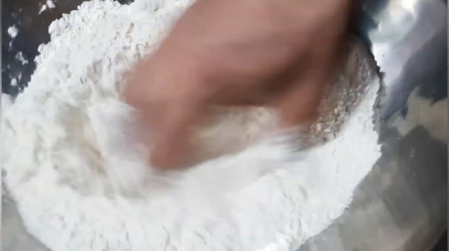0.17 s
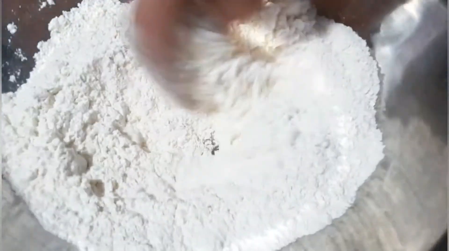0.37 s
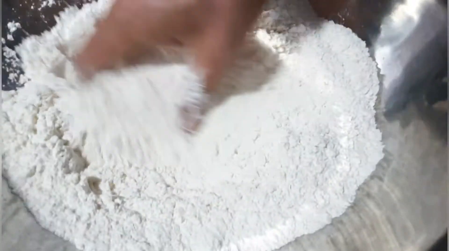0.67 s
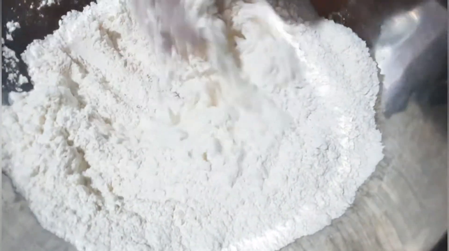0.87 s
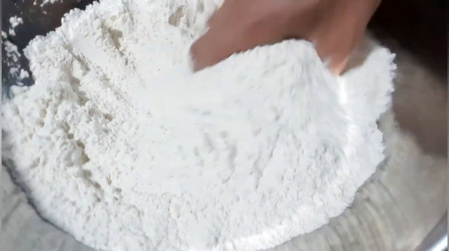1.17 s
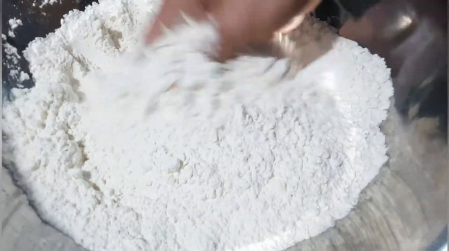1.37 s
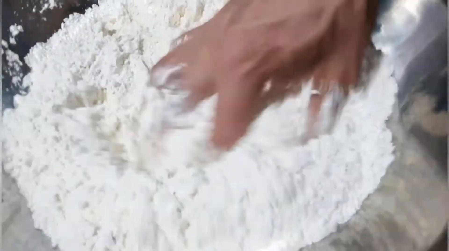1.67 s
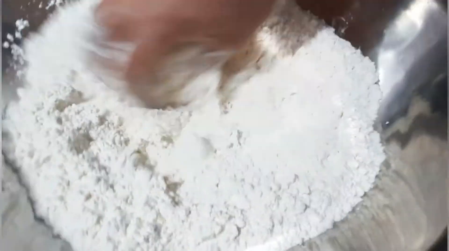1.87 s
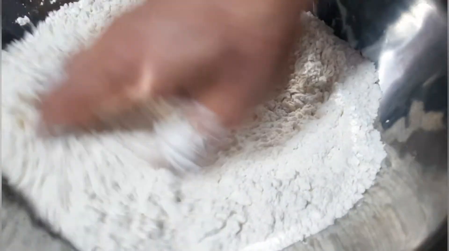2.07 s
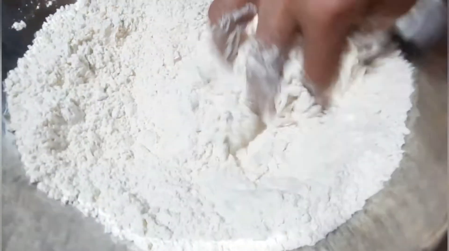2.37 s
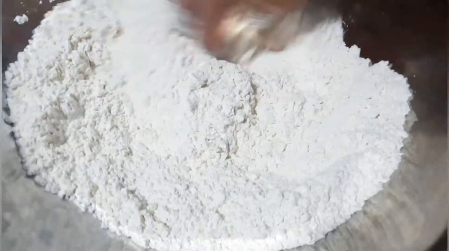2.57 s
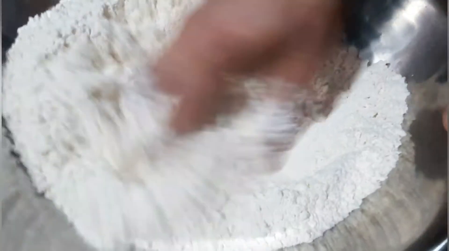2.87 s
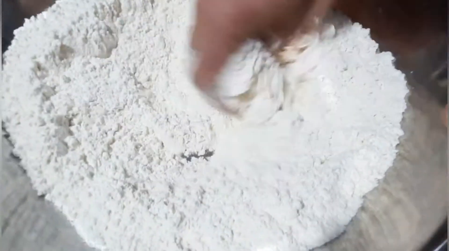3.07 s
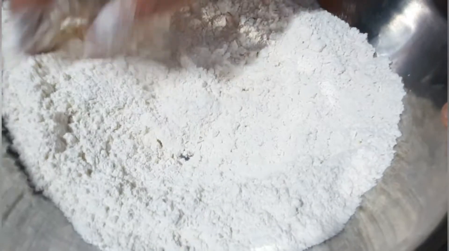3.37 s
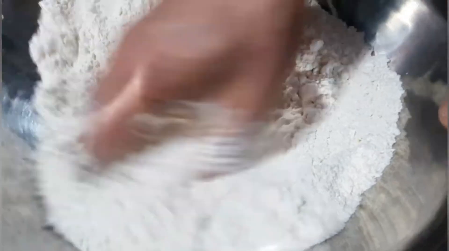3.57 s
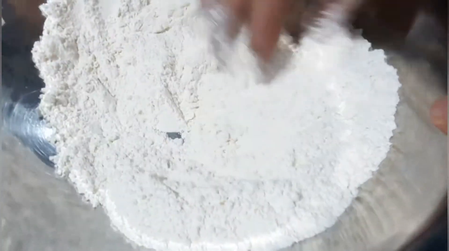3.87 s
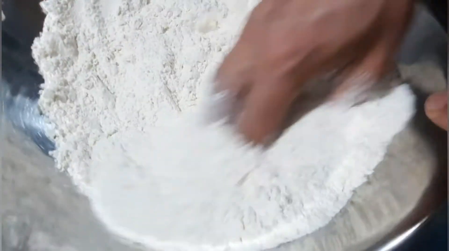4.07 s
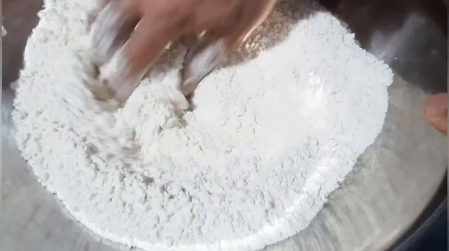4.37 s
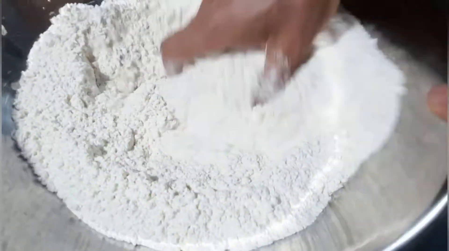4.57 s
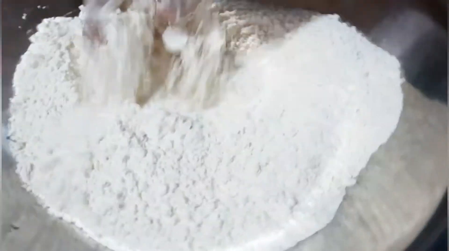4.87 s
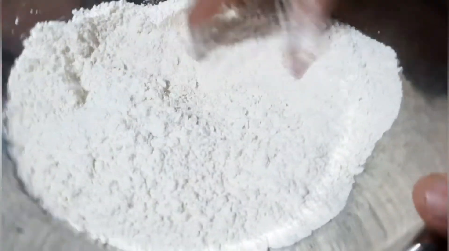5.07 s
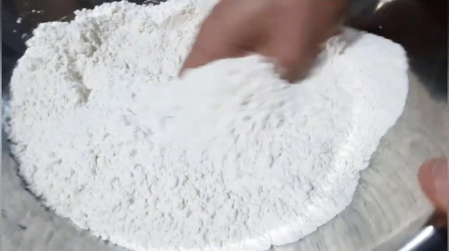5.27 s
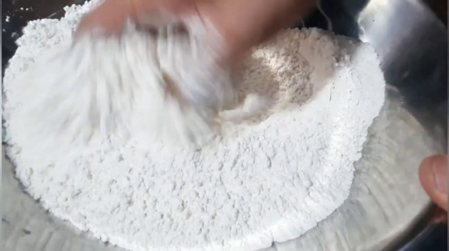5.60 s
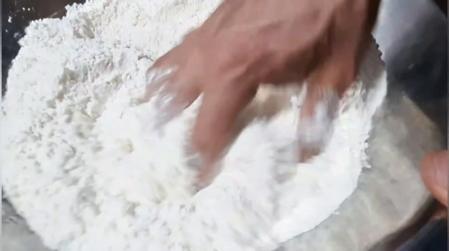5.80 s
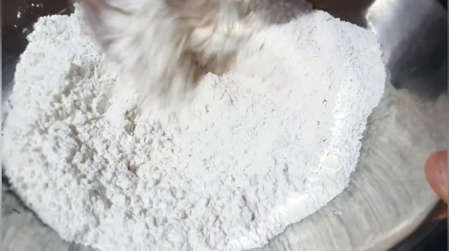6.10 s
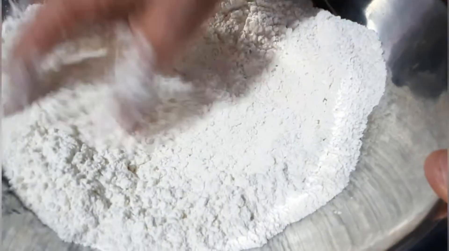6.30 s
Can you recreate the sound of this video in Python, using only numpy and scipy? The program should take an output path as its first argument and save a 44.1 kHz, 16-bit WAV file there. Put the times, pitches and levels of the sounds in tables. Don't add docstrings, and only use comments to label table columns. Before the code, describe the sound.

Irregular sandy strokes of flour come and go, some with a brief squeaky rub of fingertip on steel. Light clicks and muffled low knocks of the bowl against the table start sparse, then cluster near one, three, four and five seconds before easing. The sound is close, dry and quiet, over steady low fan hum, high shimmering insects and faint hiss.

```python
import sys
import numpy as np
from scipy import signal
from scipy.fft import rfft, irfft, next_fast_len
from scipy.io import wavfile
from scipy.ndimage import uniform_filter1d

SR = 44100
rng = np.random.default_rng(int(sys.argv[2]) if len(sys.argv) > 2 else 0)


def unload_audio(sound):
    columns = np.transpose(np.atleast_2d(sound))
    steps = np.round(np.clip(columns, -1, 1) * 32767)
    wavfile.write(sys.argv[1], SR, steps.astype(np.int16))


def nominal_scale(level):
    x = np.asarray(level, float) / 20
    return 10 ** x


N = 283959

# f/Hz, width/Hz, level/dB
HOLLOW = [(255, 30, 4), (296, 13, 12), (332, 11, 13), (353, 14, 7), (425, 25, -12), (195, 25, 3)]
CONTROL_STEP = 64
PORT_LAG, RIM_LAG = 10, 4


def evened(x):
    return x / np.sqrt(np.mean(x ** 2) + 1e-20)


def read(points, hz):
    f, value = np.transpose(points)
    return np.interp(np.log(hz + 1), np.log(f + 1), value)


def add(mix, s, sound):
    part = mix[..., round(s * SR):][..., :sound.shape[-1]]
    part += sound[..., :part.shape[-1]]


def resonate(x, hz, width):
    r = np.exp(-np.pi * width / SR)
    pole = r * np.exp(2j * np.pi * hz / SR)
    return 2 * signal.lfilter([1 - r], [1, -pole], x).real


def coloured(x, points):
    size = next_fast_len(N)
    gain = nominal_scale(read(points, np.fft.rfftfreq(size, 1 / SR)))
    return evened(irfft(rfft(x, size) * gain, size)[:N])


def drift(rate_hz):
    noise = uniform_filter1d(rng.standard_normal(N), size=200)
    return evened(signal.lfilter([1], [1, -np.exp(-2 * np.pi * rate_hz / SR)], noise))


def grit(per_s, spread_db):
    size = nominal_scale(spread_db * np.minimum(rng.exponential(1, N), 5)) * rng.choice([-1, 1], N)
    return evened(size * (rng.random(N) < per_s / SR))


def ports(x, same, pan_db, other, lag=PORT_LAG):
    same = np.clip(same, 0, 1)
    right = same * np.roll(x, lag, -1) + np.sqrt(1 - same ** 2) * other
    return np.array([x * nominal_scale(pan_db / 2), right * nominal_scale(-pan_db / 2)])


def patchy(x, depth_db, centre_hz=None, fall_db=0):
    hz, t, z = signal.stft(x, SR, nperseg=512, noverlap=384)
    patches = rng.standard_normal((len(t), len(hz))).T
    patches = uniform_filter1d(uniform_filter1d(patches, size=6, axis=0), size=9, axis=1)
    shape_db = depth_db * evened(patches)
    if fall_db:
        centre = np.interp(t, np.arange(N) / SR, centre_hz)
        away = abs(np.log2((hz[:, None] + 50) / centre))
        focus_db, focus_oct, focus_top_hz = 9, .12, 1100
        low = np.minimum(focus_top_hz / centre, 1) ** 4
        shape_db += focus_db * low * np.exp(-(away / focus_oct) ** 2) - fall_db * away
    out = signal.istft(z * nominal_scale(shape_db), SR, nperseg=512, noverlap=384)[1][..., :N]
    return out / np.sqrt(uniform_filter1d((out ** 2).mean(0), size=5000))


def strokes(rows, rise, fall):
    start, length, db, sag_db = np.array(rows).T[:4, :, None]
    since = np.arange(0, N + CONTROL_STEP, CONTROL_STEP) / SR - start
    db = db - sag_db * np.clip(since / length, 0, 1)
    db = db - rise * np.maximum(-since, 0) - fall * np.maximum(since - length, 0)
    return nominal_scale(np.maximum(db, -140)) ** 2, since


def fine(coarse):
    return np.interp(np.arange(N), np.arange(len(coarse)) * CONTROL_STEP, coarse)


def sift():
    # t/s, length/s, level/dB, sag/dB
    sweeps = [(0.004, 0.042, -72.5, 10), (0.117, 0.105, -74.5, 4), (0.205, 0.023, -57.5, 15),
              (0.234, 0.032, -64.5, -13), (0.54, 0.12, -58.5, 0.5), (1.022, 0.012, -58, 10),
              (1.056, 0.029, -47.5, 7.5), (1.146, 0.28, -62, 11.1), (1.52, 0.11, -76.5, -9.5),
              (1.67, 0.35, -61.5, 1.5), (2.06, 0.22, -60, 10.5), (2.34, 0.16, -77.5, -12),
              (2.568, 0.16, -64.5, 5.5), (2.772, 0.095, -66, 0.5), (2.94, 0.071, -52, 11.5),
              (3.03, 0.086, -70, 18.5), (3.244, 0.019, -82, -8), (3.424, 0.33, -62, 8.5),
              (4.035, 0.31, -59, 6.5), (4.368, 0.07, -61.5, -9), (4.517, 0.27, -55.5, 19),
              (4.821, 0.18, -67, 13), (5.006, 0.049, -59.5, -12.5), (5.057, 0.24, -57.5, 1.5),
              (5.36, 0.073, -71, 13), (5.699, 0.032, -60, 10), (5.747, 0.1, -64, -5),
              (5.917, 0.042, -64.5, 0.5), (6.261, 0.24, -61, 2), (6.32, 0.049, -51, 3.5)]
    # f/Hz, density/dB per Hz
    grain_spectrum = [(1760, -103), (3000, -10.5), (3450, -21), (3900, -7.5), (4240, -17), (4670, -7),
                      (5560, -0.5), (7330, -2.5), (8080, -1), (9340, -10.5), (11300, -3.5), (15700, -8)]
    # t/s, left-right level/dB
    place = [(0, 23), (.3, 10), (1.1, 9.5), (1.6, 11), (3.3, 12.5), (4.3, 10.5), (5.1, 5), (5.7, 10),
             (6.44, 12.5)]
    clumps_top_hz, clumps_late_s = 4400, 0.042
    t = np.arange(N) / SR
    sifting = fine(np.sqrt(strokes(sweeps, rise=415, fall=200)[0].sum(0)))
    powder = patchy(np.array([coloured(grit(9000, 1.0), grain_spectrum) for _ in range(2)]), 2.2)
    clumps = signal.sosfiltfilt(signal.butter(4, clumps_top_hz, fs=SR, output="sos"), powder)
    late_sifting = np.interp(t - clumps_late_s, t, sifting)
    a, b = sifting * (powder - clumps) + late_sifting * clumps
    return nominal_scale(2.5 + 1.2 * drift(34.0)) * ports(a, 0.052, np.interp(t, *np.transpose(place)), b)


def wall(contact_hz):
    # f/Hz, density/dB per Hz
    slip_spectrum = [(290, -87), (500, 13.5), (963, -7.5), (1410, -15.5), (1690, -6), (1870, -8.5),
                     (2640, -4), (3320, 0), (6000, 10.5), (7800, 5), (13200, -120)]
    # f/Hz, width/Hz, level/dB
    wall_modes = [(950, 60, 1), (1140, 90, 4), (1500, 90, 3), (1290, 150, 5), (1740, 110, 6), (2070, 80, 4),
                  (2400, 45, 6), (2590, 35, 6), (2830, 25, 5)]
    slips = np.array([coloured(grit(5000, 2.3), slip_spectrum) for _ in range(2)])
    modes = sum(nominal_scale(db) * resonate(slips, hz, width) for hz, width, db in wall_modes)
    return patchy(.5 * slips + modes, 2.5, contact_hz, fall_db=10)


def drag(scraping):
    # t/s, level/dB
    load = [(0, -52), (.08, -69), (.27, -45), (.4, -78), (.68, -59), (.92, -67), (1.15, -50.5),
            (1.6, -63.5), (1.7, -52), (2.4, -72), (3.3, -69.5), (3.65, -57), (3.95, -65.5), (4.81, -53),
            (4.84, -43.5), (5.35, -58.5), (6.2, -57.5), (6.36, -55)]
    press_db = -3
    weight = nominal_scale(np.interp(np.arange(N) / SR, *np.transpose(load)))
    dragging = np.hypot(weight, nominal_scale(press_db) * scraping)
    clicks = grit(800, 1.96)
    paths = []
    for _ in range(2):
        rung = sum(nominal_scale(db + 1.9 * drift(1.5)) * resonate(clicks, hz, w) for hz, w, db in HOLLOW)
        paths.append(evened(rung))
    a, b = signal.sosfilt(signal.butter(2, 800, fs=SR, output="sos"), paths)
    return dragging * nominal_scale(-2.0) * ports(a, 0.92, -0.059, b)


def hand():
    # t/s, length/s, level/dB, sag/dB, contact f/Hz
    finger_strokes = [(0, 0.031, -71.5, 5, 1710), (0.203, 0.018, -54.5, 9.5, 1410),
                      (0.25, 0.014, -59.5, -11, 2030), (0.476, 0.22, -75.5, -4, 1410),
                      (0.613, 0.056, -72, -11, 1640), (0.988, 0.14, -73, -10, 1260),
                      (1.36, 0.017, -76, -3.5, 1320), (1.663, 0.29, -63, 10, 1990),
                      (2.272, 0.072, -76.5, -0.5, 1500), (2.474, 0.11, -67, -5.5, 1390),
                      (2.778, 0.077, -62.5, 4, 1210), (2.87, 0.068, -72.5, -14.5, 2210),
                      (2.951, 0.12, -54.5, 19, 1380), (3.404, 0.078, -73.5, 0.5, 1400),
                      (3.52, 0.11, -62.5, 9, 1570), (3.99, 0.057, -72, 8, 1590),
                      (4.033, 0.17, -58.5, 6, 1810), (4.38, 0.092, -71.5, -11.5, 1060),
                      (4.497, 0.065, -66, -9.5, 1570), (4.721, 0.048, -63.5, 4, 1480),
                      (4.817, 0.076, -57.5, 6, 1730), (4.92, 0.042, -61, 6, 1700),
                      (5.027, 0.1, -62, -6, 1500), (5.691, .01, -60, 6, 1660), (3.988, .01, -61, 2, 1480),
                      (5.169, 0.027, -62.5, -13.5, 1790), (5.192, 0.081, -46, 9, 1400),
                      (5.218, 0.088, -59, -1.5, 1750), (5.403, 0.037, -64, 6, 1420),
                      (5.691, 0.018, -62.5, 11, 1670), (5.727, 0.043, -65.5, 4, 1380),
                      (5.831, 0.17, -66, 8.5, 1900), (6.294, 0.12, -70.5, -11, 1370)]
    climb = 0.18
    power, since = strokes(finger_strokes, rise=1300, fall=230)
    scraping = fine(np.sqrt(power.sum(0)))
    pitch_hz = np.array(finger_strokes)[:, 4:] * 2 ** (climb * np.clip(since, 0, .5))
    contact_hz = fine((power * pitch_hz).sum(0) / power.sum(0))
    a, b = wall(contact_hz)
    scrape = scraping * nominal_scale(2 + 1.3 * drift(30.0)) * ports(a, .4, 6, b)
    return sift() + scrape + drag(scraping)


def sings():
    # t/s, length/s, level/dB, f/Hz
    slides = [(1.014, 0.027, -55, 957), (1.058, 0.045, -58.5, 905), (1.078, 0.022, -65, 1840),
              (3.577, 0.018, -65, 2200), (4.029, 0.014, -55, 2300), (4.085, .03, -59, 2330),
              (4.386, 0.06, -66, 1000), (4.522, 0.032, -60.5, 930), (5.266, 0.036, -53, 1760),
              (5.268, 0.017, -52.5, 2570), (0.324, 0.007, -66.5, 1790), (4.71, 0.025, -60, 800),
              (4.84, 0.013, -52, 810), (5.272, 0.038, -56, 820), (0.593, 0.078, -69, 940),
              (2.914, 0.021, -59, 2440)]
    width_hz, edge_s = 165, 0.01
    out, slips = np.zeros((2, N)), grit(900, 0.9)
    for s, length, db, hz in slides:
        t = np.arange(0, length + 3 * edge_s, 1 / SR)
        ring = resonate(slips[round(s * SR):][:len(t)], hz, width_hz)
        ring = evened(resonate(ring, hz, 2 * width_hz))
        fade = np.clip((t[-1] - t) / (3 * edge_s), 0, 1)
        add(out, s, nominal_scale(db) * fade * ports(ring, 0.46, 1.3, 0, lag=RIM_LAG))
    return out


def ticks():
    # t/s, peak level/dB, ring f/Hz, fizz peak level/dB
    taps = [(0.109, -56, 1740, -69), (0.462, -63, 1710, -78), (0.476, -61, 1730, -78),
            (0.491, -55, 1720, -72), (3.705, -58, 3900, -72), (0.196, -40, 1490, -54),
            (0.507, -51, 1740, -62), (0.534, -53, 7000, -41), (1.022, -45, 1050, -40),
            (1.057, -56, 934, -44), (1.666, -44, 2900, -54), (1.742, -47, 3030, -58),
            (2.477, -48, 1250, -62), (2.774, -59, 1040, -63), (2.944, -52, 2600, -48),
            (2.956, -41, 1490, -55), (3.405, -54, 1730, -63), (3.516, -55, 1040, -60),
            (3.993, -45, 850, -62), (4.035, -38, 1900, -52), (4.544, -45, 1040, -55),
            (4.741, -49, 875, -71), (4.815, -39, 1850, -49), (4.858, -42, 2400, -57),
            (4.921, -43, 1700, -63), (4.96, -55, 600, -39), (5.011, -44, 5400, -48),
            (5.106, -42, 2600, -46), (5.191, -42, 1170, -56), (5.2035, -27, 1100, -55),
            (5.414, -48, 1800, -51), (5.745, -50, 1200, -60), (5.849, -55, 1710, -53),
            (0.235, -48, 1560, -58), (0.26, -38, 4040, -56), (0.267, -47, 2600, -58),
            (0.277, -46, 2300, -55), (0.291, -48, 2500, -58), (2.929, -51, 2380, -54),
            (2.993, -50, 1900, -60), (3.368, -60, 1610, -70), (4.717, -53, 929, -60),
            (4.837, -50, 1700, -58), (4.874, -50, 2200, -62), (4.615, -56, 3000, -54),
            (5.213, -47, 2000, -58), (4.8155, -45, 800, -60), (1.757, -49, 2450, -60),
            (6.377, -52, 1220, -58), (6.409, -49, 1340, -60)]
    out, t = np.zeros((2, N)), np.arange(1500) / SR
    noise = rng.standard_normal((len(taps), 3, len(t)))
    high = signal.butter(8, 4900, "high", fs=SR, output="sos")
    soft_top = signal.butter(1, 4000, fs=SR, output="sos")
    noise[:, 1:] = signal.sosfilt(np.vstack([high, soft_top]), 2 * noise[:, 1:])
    for (s, db, hz, fizz_db), (rough, c, d) in zip(taps, noise):
        click = np.sin(np.pi * np.minimum(t * hz, 1)) ** 2 * np.sin(2 * np.pi * hz * t) / 6
        click += .3 * (t == 0) + .07 * rough * nominal_scale(-60 * t / .015)
        ring = resonate(click, hz, 220.0) + .4 * resonate(click, hz * 1.75, 500.0)
        ring += .04 * resonate(click, max(2500, hz), 2000.0)
        ring -= uniform_filter1d(ring, size=round(2 * SR / hz))
        fizz_level = nominal_scale(fizz_db - 2 - 60 * t / .014) * 1.7
        tone = nominal_scale(db + 2) * ports(ring, 1, 5, 0, lag=RIM_LAG) / abs(ring).max()
        fizz = ports(fizz_level * c, .4, 9, fizz_level * d)
        add(out, s + .0003, tone + fizz)
    return out


def knocks(rows, follow, t60, count):
    # f/Hz, width/Hz, level/dB
    table_modes = [(64, 28, -27), (70, 15, -6), (102, 9.4, 4), (121, 6.1, 8)]
    out, t = np.zeros((2, N)), np.arange(count) / SR
    chance = rng.random((len(rows), 3, 9))
    for (s, db, hz, boom_db), (when, size, sign) in zip(rows, chance):
        late = np.append(0, 0.01195 + .16 * when)
        strength = np.append(1, follow * size * np.sign(sign - .5))
        blows = np.zeros(len(t))
        blows[(late * SR).astype(int)] = strength * nominal_scale(-60 * late / 0.64)
        push = np.convolve(blows, np.hanning(260))[:len(t)]
        table = resonate(push, hz, 16.5)
        table = table + 0.68 * sum(nominal_scale(d) * resonate(push, f, w) for f, w, d in table_modes)
        table = (table - uniform_filter1d(table, size=900)) * nominal_scale(-60 * t / t60)
        tap = np.convolve(blows, np.hanning(80))[:len(t)]
        boom = sum(nominal_scale(d) * resonate(tap, f, w + 33.0) for f, w, d in HOLLOW)
        add(out[0], s, -nominal_scale(db) * table / abs(table).max())
        add(out[1], s, -nominal_scale(db + boom_db) * boom / abs(boom).max())
    return ports(out[0], 0.98, 0.53, np.roll(out[0], 160)) + ports(out[1], 0.47, -3.2, 0)


def lumps():
    # t/s, peak level/dB, f/Hz
    drops = [(0.124, -51, 325), (0.154, -61, 336), (0.322, -55, 320), (0.597, -52, 288),
             (0.657, -45.5, 325.5), (1.212, -46.5, 291), (1.332, -45, 330), (1.388, -46.5, 317),
             (1.709, -40, 321), (2.008, -52, 338), (2.242, -53, 341), (2.71, -56, 296), (3.517, -46.5, 313),
             (3.592, -55, 336), (3.872, -50.5, 295), (4.029, -38, 298.3), (4.072, -45, 294),
             (4.112, -41, 302.2), (4.202, -49, 334), (4.396, -52, 324), (4.539, -46, 305),
             (4.619, -57, 339), (4.715, -45, 319), (4.773, -49, 318), (5.067, -41.5, 309),
             (5.222, -58, 335), (5.343, -52.5, 335), (5.726, -42, 323), (5.936, -46.5, 280),
             (6.088, -46.5, 315), (6.296, -44.5, 317), (6.347, -43.5, 313), (6.408, -47, 280)]
    rise_s, t60, trim_db = 0.0071, 0.18, -3.5
    out, t = np.zeros(N), np.arange(9000) / SR
    for s, db, hz in drops:
        envelope = nominal_scale(db + trim_db - 60 * t / t60) * (1 - np.exp(-t / rise_s))
        add(out, s, envelope * 2 * np.sin(2 * np.pi * hz * t))
    return ports(out, 1.0, -1.5, np.roll(out, 40))


def fan():
    # multiple of the shaft rate, level/dB, lead of the left port/rad
    shaft_orders = [(2, -72.5, 0.35), (6, -73.5, 0), (7, -68.5, 1), (8, -74.5, -1.4), (9, -68.5, -2),
                    (12, -78.5, 1.7)]
    # f/Hz, width/Hz, level/dB, left-right level/dB
    whine_bands = [
        (3255, 70, -88, 19.5),
        (1894, 100, -90, -13.5),
    ]
    # t/s, level/dB
    strain = [(0.0, -86), (0.25, -89), (3.66, -89.5), (3.77, -95), (5.16, -83.5), (5.59, -94), (5.9, -80),
              (6.15, -93), (6.44, -95.5)]
    shaft_hz = 58.5
    turn = 2 * np.pi * np.cumsum(shaft_hz * (1 + 0.00212 * drift(1.82))) / SR
    out = np.zeros((2, N))
    for k, db, lead in shaft_orders:
        phase = k * turn + np.array([[lead], [0]]) + 7 * rng.random()
        out += np.sqrt(2) * nominal_scale(db + 1.4 * drift(8.0)) * np.cos(phase)
    strain_db = np.interp(np.arange(N) / SR, *np.transpose(strain)) - np.mean(strain, 0)[1]
    for hz, width, db, pan_db in whine_bands:
        noises = rng.standard_normal((2, N))
        a, b = (evened(resonate(resonate(x, hz, width), hz, width)) for x in noises)
        a = .8 * a + .7 * np.cos(round(hz / shaft_hz) * turn)
        level = nominal_scale(db + strain_db + .8 * drift(1.5)) * (1 + .3 * np.cos(turn))
        out += level * ports(a, .6, pan_db, b)
    return out


def insects():
    # f/Hz, width/Hz, level/dB
    bodies = [(6120, 340, 3.5), (5898, 380, -1), (4920, 98, -15.5), (7400, 1300, -22)]
    chorus_db, throb_hz, throb_start_s = -62, 5.1, 0.1
    t = np.arange(N) / SR
    throb = np.cos(2 * np.pi * throb_hz * (t - throb_start_s) + 0.1 * drift(0.36))
    out = []
    for depth_db, side_db in ((1.8, -0.59), (2.6, 0.52)):
        clicks = grit(5000, 0.71)
        body = sum(nominal_scale(db) * resonate(resonate(clicks, hz, w), hz, w) for hz, w, db in bodies)
        level_db = chorus_db + side_db + depth_db * throb + 1.5 * drift(5)
        out.append(nominal_scale(level_db) * evened(body))
    return np.array(out)


def room():
    # f/Hz, density/dB per Hz
    hiss_spectrum = [(25, -31), (50, -9), (120, -8.5), (200, -3), (320, 3.5), (460, -18.5), (620, -19.5),
                     (830, -23.5), (1100, -35.5), (2800, -33), (4400, -55), (7200, -27), (9500, -44.5),
                     (12500, -31.5), (15900, -47)]
    # f/Hz, likeness/1
    likeness = [(60, 0.8), (300, 0.91), (550, 0.49), (15000, 0.12)]
    # f/Hz, left-right level/dB
    balance = [(60, 11.5), (300, -6.5), (700, -22), (1300, 19), (4400, -6), (12000, 16), (15900, -26)]
    frames, hz = N // 512 + 5, np.fft.rfftfreq(2048, 1 / SR)
    a, b, c, d, patches = rng.standard_normal((frames, 1025, 5)).T
    patches = evened(uniform_filter1d(uniform_filter1d(patches, size=20, axis=0), size=8, axis=1))
    same = np.clip(read(likeness, hz), -1, 1)[:, None]
    left = a + 1j * b
    z = np.array([left, same * left + np.sqrt(1 - same ** 2) * (c + 1j * d)])
    side_db = read(balance, hz)[:, None] / 2
    patch_db = np.where(hz > 800, 2.2, 1.2)[:, None] * patches
    z *= nominal_scale(read(hiss_spectrum, hz)[:, None] + patch_db + np.array([side_db, -side_db]))
    return nominal_scale(-60) * evened(signal.istft(z, nperseg=2048, noverlap=1536)[1][:, :N])


def scene():
    # t/s, peak level/dB, table f/Hz, bowl boom level/dB
    knock_rows = [(0.017, -46.5, 103, -23), (0.193, -42.5, 73.5, 0), (0.239, -50, 56.7, -22),
                  (0.559, -51.5, 128, -11), (1.03, -40.5, 80.7, -5), (1.15, -40.5, 127, -15),
                  (1.198, -52, 125, -10), (1.76, -41.5, 62, -11), (2.635, -51, 62, -12), (4.09, -44, 73, 5),
                  (4.277, -61, 121, -17), (4.401, -55, 118, 11.5), (4.97, -45, 118, 0), (5.76, -49, 136, 6),
                  (6.013, -49, 59, 4), (6.298, -52, 126, 0)]
    # t/s, peak level/dB, table f/Hz, bowl boom level/dB
    bounce_rows = [(0.195, -44, 69, 9.5), (0.207, -42, 70.0, -2), (0.233, -45, 129, -4),
                   (1.055, -38, 102, -8), (1.072, -38, 61.9, -10), (1.102, -40.5, 90, -15),
                   (1.128, -37.5, 118, -7), (1.141, -53, 133, -16), (1.672, -39, 98, -4),
                   (1.69, -40, 65, -7), (1.704, -40, 64, -5), (1.725, -45, 135, -10),
                   (1.747, -42, 78.1, -20), (2.962, -36, 115, 1.5), (2.976, -38, 81.5, -5),
                   (2.992, -44, 61.9, 7), (3.012, -44, 118, -15), (3.026, -39.5, 126, -13),
                   (3.043, -40, 133, -15), (3.091, -47, 121, -35), (3.989, -38.5, 152, 7.5),
                   (3.994, -33.5, 102, -2), (4.01, -36.5, 83.4, 2), (4.023, -40, 88.8, -1),
                   (4.036, -35, 91.5, -17), (4.055, -32.5, 107, -8), (4.07, -42.5, 90, 5),
                   (4.089, -38, 64.6, 0), (4.823, -29.5, 93, -1), (4.833, -39, 96.9, -2),
                   (4.841, -31.5, 74.4, -2), (4.866, -34, 88, 1), (4.894, -32, 95, -8),
                   (4.92, -36.5, 116, -0.5), (4.942, -36, 96.9, -15), (4.959, -45, 96.9, 3),
                   (4.97, -40, 59.2, -5), (5.089, -33.5, 155, -6), (5.103, -29.5, 99.6, -10),
                   (5.122, -41, 96, -1), (5.134, -37, 56.5, 0), (5.146, -35, 91.5, -15),
                   (5.162, -40, 96.9, -12), (5.174, -40, 72.7, -16), (5.223, -44, 98, -22),
                   (5.247, -41, 70.0, -21), (5.414, -46.5, 121, 5), (5.744, -46.5, 129, 10.5)]
    # t/s, peak level/dB, table f/Hz, bowl
    # boom level/dB
    more_bounce_rows = [(.487, -45, 105, -27), (0.505, -52, 75.6, -15), (.518, -46, 75, -13),
                        (0.531, -53, 80, -4), (.541, -42, 80, -15), (0.556, -47, 110, -4), (.571, -47, 120, -5),
                        (.587, -50, 90, -10), (1.929, -58, 70, -8), (1.956, -50, 80, -12), (1.98, -50, 70, 2),
                        (3.107, -48, 110, -26), (3.383, -54, 75, -18), (3.399, -49, 80, -8),
                        (3.419, -50, 75, -12), (3.445, -50, 70, -12), (3.465, -55, 65, -13)]
    bowl = knocks(knock_rows, follow=2.37, t60=3.0, count=14000) + lumps()
    bowl += knocks(bounce_rows + more_bounce_rows, follow=0.24, t60=0.16, count=8000)
    return hand() + sings() + ticks() + bowl + fan() + insects() + room()


def low_pass(x):
    return signal.sosfilt(signal.butter(12, 15770, fs=SR, output="sos"), x)


def record(dry):
    cut = signal.sosfilt(signal.butter(2, 35.0, "high", fs=SR, output="sos"), dry)
    cut = irfft(rfft(cut) * (np.fft.rfftfreq(N, 1 / SR) < 15760), N)
    return low_pass(cut)


dry = scene()
out = record(dry)
unload_audio(out)
```